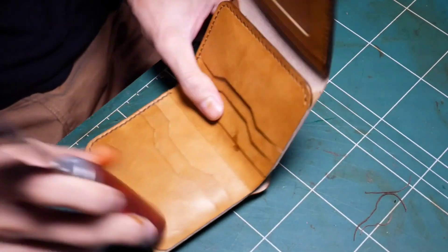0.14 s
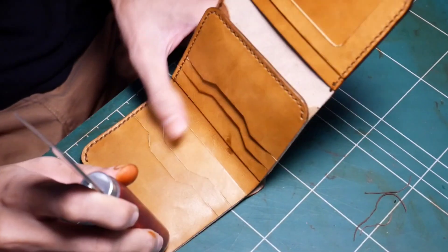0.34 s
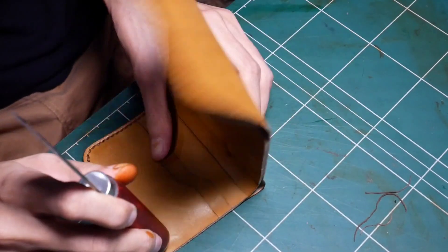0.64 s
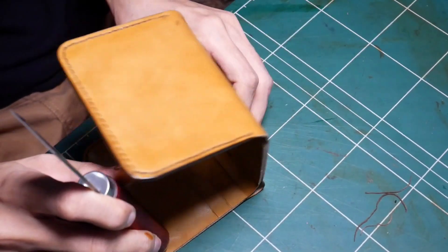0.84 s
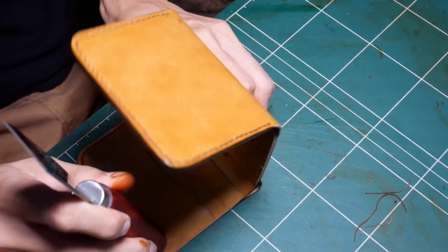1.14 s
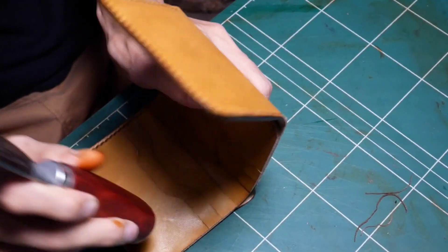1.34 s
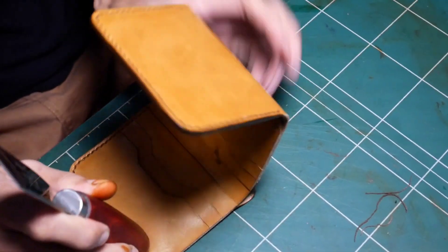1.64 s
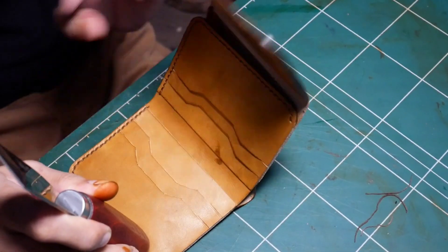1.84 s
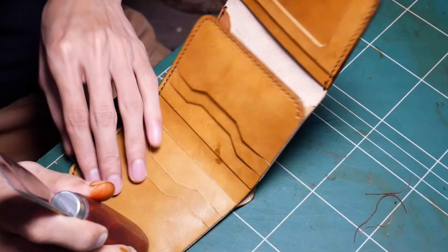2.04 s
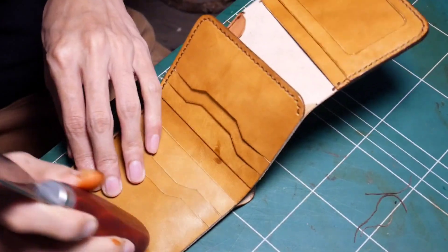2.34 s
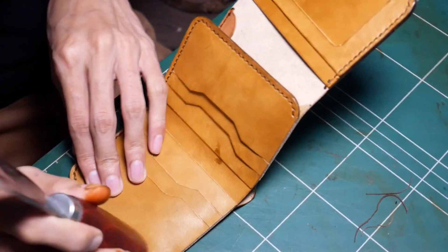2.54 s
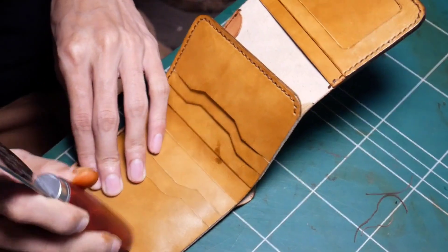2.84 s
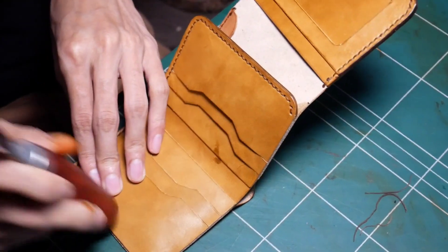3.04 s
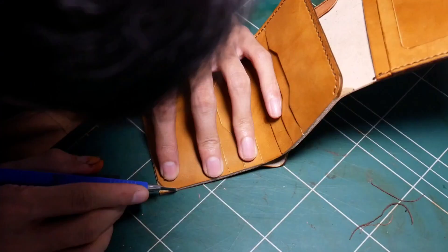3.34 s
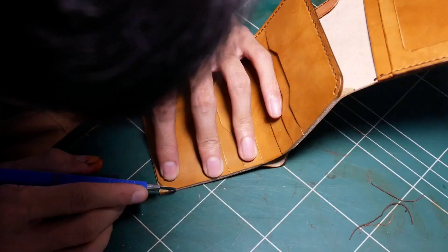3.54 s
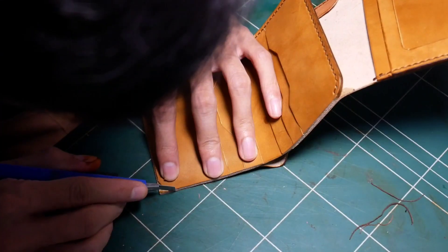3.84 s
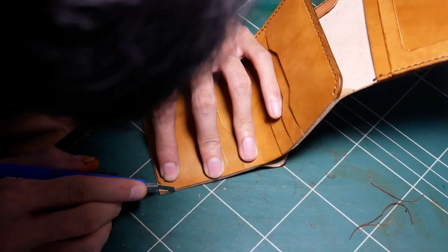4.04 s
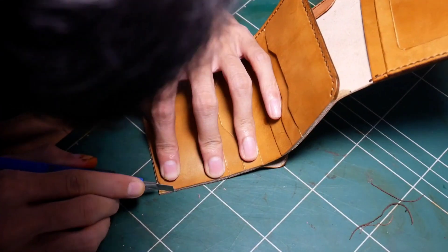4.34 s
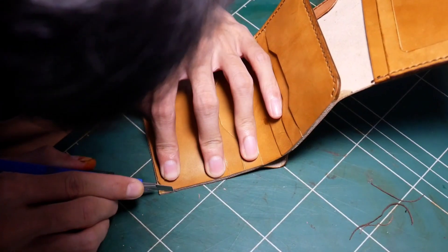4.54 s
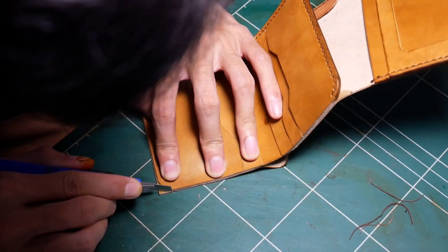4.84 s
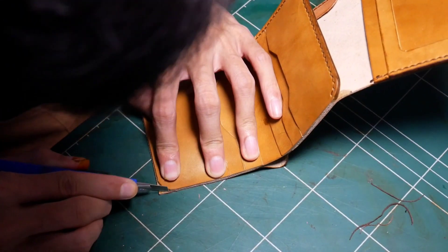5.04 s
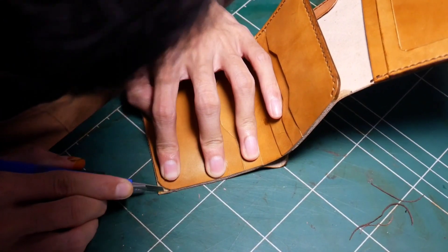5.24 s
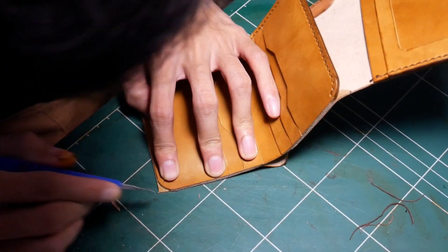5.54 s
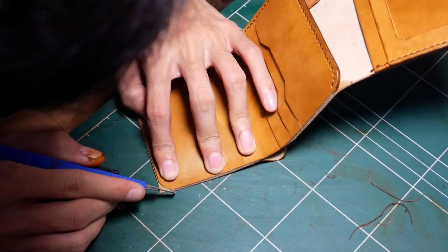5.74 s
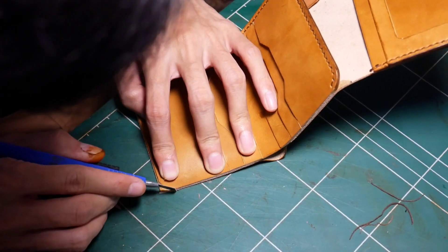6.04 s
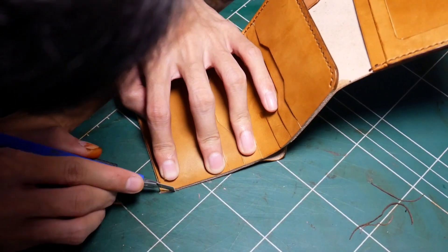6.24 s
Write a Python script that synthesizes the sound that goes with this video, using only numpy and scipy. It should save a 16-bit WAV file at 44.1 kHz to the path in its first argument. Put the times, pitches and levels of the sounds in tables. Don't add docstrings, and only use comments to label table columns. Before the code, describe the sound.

Sharp woody knocks with soft thuds on leather, brief creaking handling, then fine dry scraping and snaps as an engine rises outside.

```python
import sys
import numpy as np
from scipy import signal
from scipy.io import wavfile

SR = 44100
rng = np.random.default_rng(int(sys.argv[2]) if len(sys.argv) > 2 else 0)


def transcribe(u):
    v = np.clip(np.atleast_2d(u).T, -1, 1)
    q = np.round(v * 32767).astype(np.int16)
    wavfile.write(sys.argv[1], SR, q)


def linear_from_db(decibels):
    return 10 ** (np.asarray(decibels, float) / 20)


N = 281799

# (frequency [Hz], left-right likeness [-1..1])
ECHO_LIKENESS = [(60, 0.99), (130, 1), (290, 1), (640, 0.53), (1410, 0.29), (3100, 1), (6820, 0.037),
                 (15000, 0.52)]


def rms_one(x):
    return x / np.sqrt(np.mean(x ** 2) + 1e-20)


def filtered(x, order, hz, kind="low"):
    return signal.sosfilt(signal.butter(order, hz, kind, fs=SR, output="sos"), x)


def in_time(rows):
    s, *columns = np.transpose(rows)
    return [np.interp(np.arange(N) / SR, s, column) for column in columns]


def at_hz(points, hz):
    table_hz, value = np.transpose(points)
    return np.interp(np.log(hz), np.log(table_hz), value)


def drift(rate):
    r = np.exp(-80 * np.pi * rate / SR)
    chance = rng.standard_normal(N // 40 + 2002)
    slow = signal.lfilter([1], [1, -2 * r, r * r], chance)[2000:]
    return np.interp(np.arange(N) / 40, np.arange(len(slow)), rms_one(slow))


def ring(clicks, hz, t60):
    r = linear_from_db(-60 / (t60 * SR))
    w = 2 * np.pi * hz / SR
    return signal.lfilter([0, np.sin(w)], [1, -2 * r * np.cos(w), r * r], clicks + 1e-18)


def strike(clicks, modes):
    return sum(linear_from_db(db) * ring(clicks, hz, t60) for hz, db, t60 in modes)


def clicks_at(s, heights):
    return np.bincount(np.round(np.asarray(s) * SR).astype(int), heights, N)[:N]


def grains(per_s, spread_db):
    shape = (2, 2, N)
    size_db = spread_db * np.minimum(rng.exponential(1, shape), 5)
    sizes = linear_from_db(size_db) * np.sign(rng.random(shape) - .5)
    chance_of_click = per_s * linear_from_db(3.0 * drift(40)) / SR
    return sizes * (rng.random(shape) < chance_of_click)


def bands(source, spectrum, likeness, gain):
    band_edges = 25 * 2 ** np.arange(0, 9.4, 1 / 3)
    out = 0
    for k, (low, high) in enumerate(zip(band_edges, band_edges[1:])):
        hz = np.sqrt(low * high)
        if spectrum[0][0] < hz < spectrum[-1][0]:
            mid, side = filtered(source[k % 2], 2, [low, high], "band")
            alike = np.clip(at_hz(likeness, hz), -1, 1)
            pair = np.sqrt(1 + alike) * mid + np.sqrt(1 - alike) * side * [[1], [-1]]
            out = out + linear_from_db(at_hz(spectrum, hz)) * gain(hz) * pair
    return out


def raps():
    # (time [s], thud [dB], crack [dB], crack lead [s], rattle [dB])
    blows = [
        (0.2336, 1, -4.5, 0.00089, -25.5),
        (1.4942, 3.5, -2, 0.0012, -30),
        (2.569, 2.5, -3, 0.00065, -27.5),
        (2.855, 3, -9.5, 0.0013, -28),
        (3.1226, 4, -14.5, 0.0014, -21),
    ]
    # (frequency [Hz], level [dB], t60 [s])
    thud_modes = [(256, -15.5, 0.037), (329.6, 5, 0.013), (550, -3, 0.003), (860, -5.5, 0.022)]
    # (frequency [Hz], level [dB], t60 [s])
    handle_modes = [(1300, -1.5, 0.017), (1780, 1.5, 0.0098), (2600, -0.5, 0.01), (3300, -10.5, 0.0046),
                    (4200, -23, 0.0088)]
    # (frequency [Hz], level [dB], t60 [s], pan [dB])
    bench_modes = [(125.2, -0.5, 0.29, -6), (154, -45, 0.46, -4), (196, -10.5, 0.73, -8),
                   (224.7, -2, 0.39, 2), (276.4, 10, 0.23, 18), (316, -3, 0.43, 5), (347, -1, 0.29, 1),
                   (391.8, -3.5, 0.2, 47), (446, 0, 0.26, 5), (499, -2.5, 0.36, 46), (600, -44, 0.31, 10),
                   (754, -4.5, 0.15, 23), (884, -40.5, 0.29, -7)]
    # (frequency [Hz], density [dB per Hz])
    tool_colour = [(590, -19), (1000, -1.5), (1790, -4.5), (2870, -2.5), (6110, -26), (6860, -21.5),
                   (11600, -18.5), (14600, -37), (16000, -43)]
    spots_m = np.array([0.075, 0.19, .2, 0.24, 0.15])
    grip_db, handle_wave_m_per_s = 2, 910
    spot_db, bench_wave_m_per_s = 1.5, 138

    s, thud_db, crack_db, lead_s, rattle_db = np.transpose(blows)
    nearest = np.searchsorted(s[1:] - .01, np.arange(N) / SR)
    bounce_db = -10.5 - 0.26 * crack_db
    blow = clicks_at(s, linear_from_db(thud_db)) + clicks_at(s + .0088, linear_from_db(thud_db + bounce_db))
    soft = np.exp(-2 * np.pi * 1100 / SR)
    push = signal.lfilter([(1 - soft) ** 2], [1, -2 * soft, soft ** 2], blow)

    touch = linear_from_db(-13.5) * clicks_at(s - lead_s * 1.193, linear_from_db(crack_db))
    touch -= clicks_at(s - lead_s / 2, linear_from_db(crack_db))
    touch += clicks_at(s + .0005, linear_from_db(crack_db - 9.0))
    crack = 0
    for mode in handle_modes:
        grip = linear_from_db(grip_db * np.cos(spots_m * mode[0] * 2 * np.pi / handle_wave_m_per_s))
        crack = crack + strike(touch * grip[nearest], [mode])
    crack = filtered(crack, 4, 4600)
    near = linear_from_db(-2) * crack + linear_from_db(-4.5) * strike(push, thud_modes)
    near = filtered(near, 4, 165, "high")

    bench = 0
    for hz, db, t60, pan_db in bench_modes:
        spot = linear_from_db(spot_db * np.cos(hz * spots_m * 2 * np.pi / bench_wave_m_per_s))
        sides = linear_from_db(db - 25.5 + pan_db * np.array([[.25], [-.25]]))
        bench = bench + sides * ring(push * spot[nearest], hz, t60)
    bench = filtered(bench, 4, 105, "high")

    jolts = clicks_at(s + 0.0017, linear_from_db(rattle_db - 3.5)) + clicks_at(s + 0.0076, linear_from_db(rattle_db - 4.5))
    shaking = signal.lfilter([1], [1, -linear_from_db(-60 / (.16 * SR))], jolts)
    tools = bands(grains(2600, spread_db=3.5), tool_colour, ECHO_LIKENESS, lambda hz: 1)
    rattle = shaking * rms_one(tools)
    return near * linear_from_db([[-.6], [.6]]) + bench + rattle + linear_from_db(-36.0) * reverberation(blow)


def ticks():
    # (time [s], peak [dB], pitch [Hz], brightness [dB])
    small_ticks = [(0.0677, -46, 1490, -37), (0.0992, -39, 1420, -31), (0.59, -43, 1890, -32),
                   (0.6653, -41, 1830, -34), (0.707, -40, 2600, -35), (1.0824, -34, 2500, -39),
                   (2.082, -42, 2490, -24), (2.1, -36.5, 2470, -37), (3.9403, -40.5, 1780, -10),
                   (3.982, -38, 2570, -31), (4.2126, -41, 1770, -21), (0.7862, -29, 564, -40),
                   (4.4165, -38, 1830, -32), (4.4525, -43, 1840, -25), (4.94, -35, 2415, 2),
                   (5.0917, -40, 1723, -42), (5.255, -40, 2730, -26), (2.557, -38, 1000, -35),
                   (5.913, -32, 3300, -18), (5.959, -37, 1660, -15), (5.976, -33, 1768, -15),
                   (6.0308, -40, 3450, -23)]
    # (time [s], peak [dB], pitch [Hz], brightness [dB],
    # length [s])
    more_ticks = [(0.2199, -25.5, 1300, -22, 0.027), (.2200, -26, 2680, -35, 0.025),
                  (0.767, -39, 1790, -35, 0.018), (0.7858, -15, 2600, -37, 0.03),
                  (.7860, -21, 1110, -42, 0.0066), (0.787, -15.5, 1800, -34, 0.021),
                  (0.784, -26.5, 3360, -35, .008), (1.501, -14.5, 2820, -29, .01),
                  (3.121, -24, 1670, -31, 0.009), (4.329, -24, 2750, -32, .0015),
                  (4.597, -24, 2700, -33, 0.0015), (5.4359, -23, 1850, 1.5, 0.036),
                  (5.436, -25, 3530, -30, 0.025), (5.4716, -19, 3300, -5, 0.013),
                  (5.4717, -24.5, 2010, -30, 0.011), (5.4830, -20, 2820, -19, 0.022),
                  (5.4833, -28.5, 1670, -30, 0.0094), (5.378, -31, 1680, -6, .015)]
    tick_s = .009
    edge_modes = [(7340, -14, .002), (10200, 4, 0.0018), (13000, -14, .001)]

    out = np.zeros((2, N))
    t = np.arange(1800) / SR
    rows = [(*row, tick_s) for row in small_ticks] + more_ticks
    for s, peak_db, hz, bright_db, t60 in rows:
        slips = rng.standard_normal((3, len(t))) * linear_from_db(-60 * t / min(t60, .024))
        slips[0, 0] = 5
        cluster = [(hz, 0, .010), (hz * 1.13, -3, .008), (hz * .88, -4, .008), (hz * 1.4, -14, .004)]
        body = filtered(strike(slips[0], cluster), 2, [hz * .74, hz * 1.36], "band")
        body = body / abs(body).max()
        if t60 == tick_s and hz > 1200:
            flap = filtered(slips[0] * linear_from_db(-60 * t / .006), 4, [1200, 3600], "band")
            body = body + linear_from_db(3) * flap / abs(flap).max()
        edge = strike(slips[1:] + slips[0], edge_modes)
        i = round(s * SR)
        tick = body / abs(body).max() + linear_from_db(bright_db) * edge / abs(edge).max()
        out[:, i:i + len(t)] += linear_from_db(peak_db) * tick
    return out


def rubbing():
    # (middle [s], half-length [s], rub [dB], brightness [dB])
    slides = [(0.01, 0.11, -59.5, -29), (0.723, 0.041, -60, -22), (1.14, 0.11, -58, -17),
              (.82, .03, -45, -24), (1.206, .025, -53, -15), (1.278, 0.045, -44.5, -16),
              (2.235, .04, -58.5, -25), (4.42, 0.052, -66, -8), (5.2, 0.34, -58.5, -17),
              (5.384, 0.038, -44.5, -8.5), (5.45, 0.021, -40.5, -9), (5.69, .085, -51, -20)]
    # (time [s], dying time [s], rub [dB], brightness [dB])
    skids = [
        (.8, .45, -49, -16),
        (2.086, 0.18, -49, -15),
        (3.955, 0.5, -55, -10),
        (5.483, .2, -36.5, 2),
        (5.968, 0.2, -41, -7),
    ]
    # (frequency [Hz], density [dB per Hz])
    body_colour = [(700, -34), (1150, -16), (1650, -3), (2200, -4), (2900, 0), (3900, -6), (5300, -24),
                   (7000, -40)]
    # (frequency [Hz], density [dB per Hz])
    edge_colour = [(3240, -4), (5500, -23), (7390, -3), (9070, -8.5), (10700, -6.5), (13000, -19),
                   (15600, -50), (16000, -73)]
    close = [(700, 1.0), (3000, 0.93), (7000, 0.17), (15000, 0.18)]   # (frequency [Hz], likeness)
    rest_db, rest_bright_db = -67, -8.5
    shaving_from_s, shaving_db, shaving_grows_db_per_s = 3.67, -62.5, 0.73
    skid_attack_s = .008

    t = np.arange(N) / SR
    shaving = shaving_db + shaving_grows_db_per_s * (t - shaving_from_s)
    strokes = [(linear_from_db(np.where(t < shaving_from_s, rest_db, shaving)), rest_bright_db)]
    for s, half_s, db, bright_db in slides:
        strokes.append((linear_from_db(db) * np.exp(-((t - s) / half_s) ** 2), bright_db))
    for s, dying_s, db, bright_db in skids:
        rise = (s - t) * dying_s / skid_attack_s / 6
        strokes.append((linear_from_db(db - 60 * np.maximum(t - s, rise) / dying_s), bright_db))
    pressure = np.sqrt(sum(force ** 2 for force, _ in strokes))
    hiss = np.sqrt(sum((force * linear_from_db(bright_db)) ** 2 for force, bright_db in strokes))

    fibres = grains(4000, spread_db=4.2)
    finer = fibres[..., ::-1] + 1.5 * rng.standard_normal(fibres.shape)
    body = rms_one(bands(fibres, body_colour, close, lambda hz: 1))
    edge = rms_one(bands(finer, edge_colour, close, lambda hz: 1))
    return pressure * body + hiss * edge


def bump():
    # (time [s], level [dB], frequency [Hz])
    leans = [
        (5.475, -47, 35),
        (6.378, -36, 37.4),
    ]
    t = np.arange(N) / SR
    pushes = 0
    for s, db, hz in leans:
        swell = np.exp(-((t - s - .5 / hz) * hz * 3) ** 2)
        pushes = pushes + linear_from_db(db) * np.sin(2 * np.pi * hz * (t - s)) * swell
    return pushes * linear_from_db([[3.5], [-3.5]])


def engine():
    # (time [s], second order [Hz], nearness [dB], load as third order over second [dB])
    drive = [(3.35, 92.3, -49, 6), (3.68, 92.2, -49.5, -1), (4.07, 95.0, -48.5, 6.5),
             (4.42, 96.0, -54.5, 8), (4.65, 96.2, -45.5, 2), (4.85, 97.5, -47, -10), (5.06, 98.2, -37, -10),
             (5.31, 99.1, -35.5, -2.5), (5.85, 99.6, -35.5, 0.1), (6.3, 100.4, -35.5, 4),
             (6.39, 98, -42, 12)]
    # (order, level under the low pair [dB])
    upper_orders = [(4, -19.5), (5, -21), (6, -31)]
    hz, second_db, load_db = in_time(drive)
    third_db = second_db + load_db
    turn = np.pi * np.cumsum(hz) / SR
    out = linear_from_db(second_db + .8 * drift(9)) * np.sin(2 * turn)
    out += linear_from_db(third_db + .8 * drift(9)) * np.sin(3 * turn + 1)
    for order, db in upper_orders:
        level_db = (second_db + third_db) / 2 + db + 4.3 * drift(2.4)
        out += linear_from_db(level_db) * np.sin(order * turn + 0.79 * drift(7.9))
    fade_in = np.clip((np.arange(N) / SR - drive[0][0]) / 0.011, 0, 1)
    return np.sqrt(2) * out * fade_in


def far_motor():
    # (time [s], frequency [Hz], level [dB])
    swells = [(2.0, 248, -66), (2.1, 246, -52), (2.25, 249, -61), (2.36, 247.3, -50.5), (2.5, 245, -53.5),
              (2.6, 249, -53)]
    hz, level_db = in_time(swells)
    tone = np.sin(2 * np.pi * np.cumsum(hz) / SR)
    return np.sqrt(2) * linear_from_db(level_db) * tone * linear_from_db([[1.5], [-1.5]])


def stepper():
    # (frequency [Hz], level [dB], t60 [s])
    case_modes = [(1280, -3, .010), (2100, -8, .005), (2760, 0, .009)]
    # (time [s], force [dB])
    force_curve = [(0, -68), (1.0, -49), (1.8, -52.5), (2.5, -48.5), (3.3, -58), (3.4, -71.5),
                   (6.39, -50.5)]
    s = np.arange(.0032, N / SR - .01, 1 / 50)
    uneven_db = 3.5 * np.minimum(rng.standard_normal(len(s)), 1.2)
    force_db = np.interp(s, *np.transpose(force_curve)) + uneven_db
    force_db[::2] += 2.5
    steps = strike(clicks_at(s, linear_from_db(force_db)), case_modes)
    return filtered(steps, 3, 3500) * linear_from_db([[-1.5], [1.5]])


def background():
    # (frequency [Hz], density [dB per Hz])
    air_colour = [(15, -81), (25, -41), (92, -10.5), (127, -4.5), (206, -6.5), (242, -4.5), (317, -9),
                  (394, -9), (714, -13.5), (1130, -16.5), (1260, -21.5), (2760, -30.5), (3620, -36),
                  (14400, -46.5), (16000, -55)]
    # (frequency [Hz], left-right likeness [-1..1])
    air_likeness = [(60, 0.98), (130, 0.25), (290, 0.13), (640, -0.13), (1410, -0.22), (3100, 1),
                    (6820, -0.9), (15000, 1)]
    # (time [s], level [dB])
    traffic = [(0, -58), (.55, -63.5), (.8, -57.5), (1.47, -59), (2.0, -59.5), (3.3, -59), (3.36, -54.5),
               (5.2, -50), (5.55, -52.5), (6.39, -49.5)]
    # (frequency [Hz], width [Hz], level [dB])
    fan_hums = [(128, 6.1, -57.5), (489.2, 21, -57), (708, 3.4, -67.5)]

    rumble_db = in_time(traffic)[0]
    lift = rumble_db - rumble_db[2 * SR]
    together = drift(12)

    def swell(hz):
        traffic_share = np.clip(1.3 - hz / 9000, 0, 1)
        return linear_from_db(lift * traffic_share + 0.62 * together + 0.39 * drift(4.4))

    air = bands(rng.standard_normal((2, 2, N)), air_colour, air_likeness, swell)
    air = filtered(air, 2, 90, "high")
    air = air - 0.64 * signal.lfilter(*signal.iirpeak(1120, 3.5, SR), air)
    air = filtered(air, 8, 15000)
    air = linear_from_db(-50.5) * air / np.std(air[:, 2 * SR:5 * SR // 2])

    hums = 0
    for hz, width, db in fan_hums:
        hums = hums + linear_from_db(db) * rms_one(ring(rng.standard_normal(N), hz, 1.8 / width))
    return air * linear_from_db([[.8], [-.8]]) + filtered(hums, 2, 60, "high")


def reverberation(clicks):
    # (frequency [Hz], density [dB per Hz])
    echo_colour = [(240, -40), (400, 10), (432, -2.5), (906, -15), (1110, -43), (1350, -18.5),
                   (2710, -26.5), (2930, -32.5), (6050, -39), (7280, -33.5), (14100, -58.5), (16000, -100)]
    # (frequency [Hz], t60 [s])
    echo_t60 = [(60, 0.31), (250, 0.35), (1000, 0.45), (3000, 0.55), (7000, 0.46), (14000, 0.37)]
    t = np.arange(SR // 2) / SR
    swell = 1 - np.exp(-t / 0.00043)
    tail = bands(rng.standard_normal((2, 2, len(t))), echo_colour, ECHO_LIKENESS,
                 lambda hz: swell * linear_from_db(-60 * t / at_hz(echo_t60, hz)))
    return signal.fftconvolve(rms_one(tail), clicks[None], axes=1)[:, :N]


def scene():
    small = ticks()
    wet = np.diff(reverberation(small[0]), 2, prepend=np.zeros((2, 2)))
    hands = raps() + small + linear_from_db(-34.5) * wet + rubbing() + bump()
    return hands + engine() + far_motor() + stepper() + background()


def top_cut(x):
    return signal.sosfilt(signal.butter(12, 16440, fs=SR, output="sos"), x)


def record(dry):
    dry = dry + 0.92 * signal.lfilter(*signal.iirpeak(7260, 16, SR), dry)
    rounded = dry / (1 + abs(dry) ** 8) ** (1 / 8)
    return top_cut(rounded)


dry = scene()
out = record(dry)
transcribe(out)
```